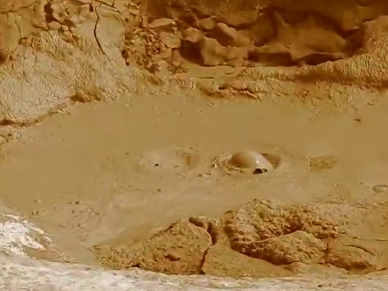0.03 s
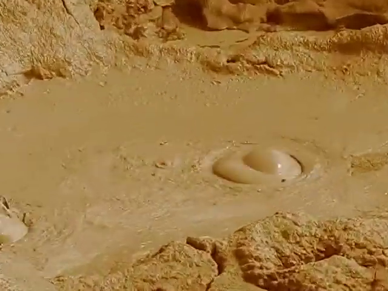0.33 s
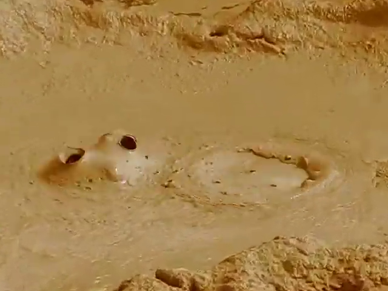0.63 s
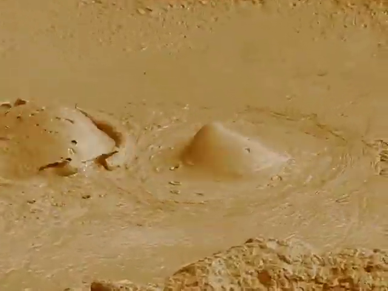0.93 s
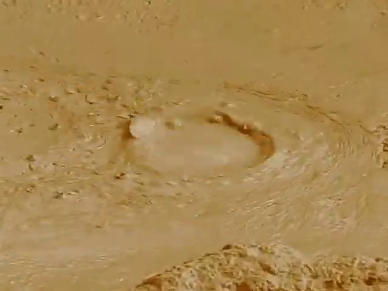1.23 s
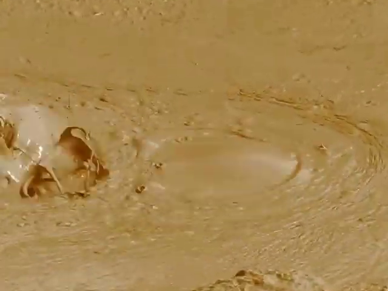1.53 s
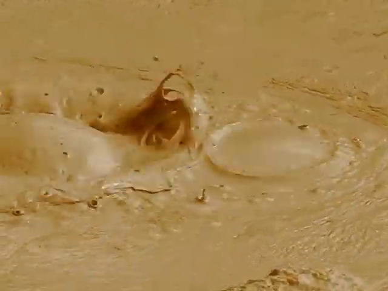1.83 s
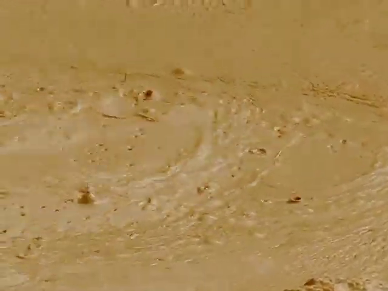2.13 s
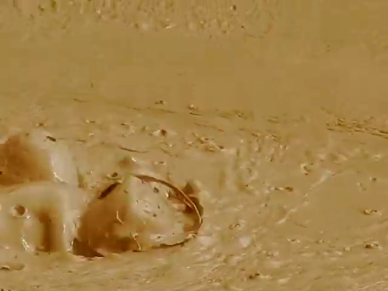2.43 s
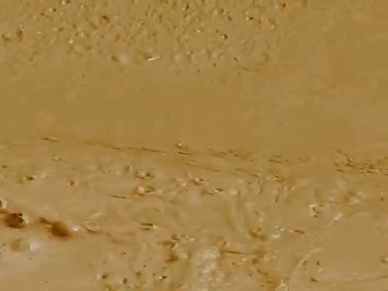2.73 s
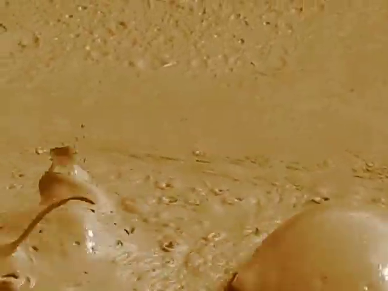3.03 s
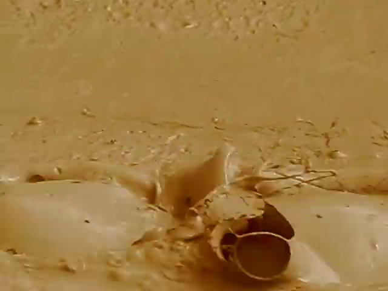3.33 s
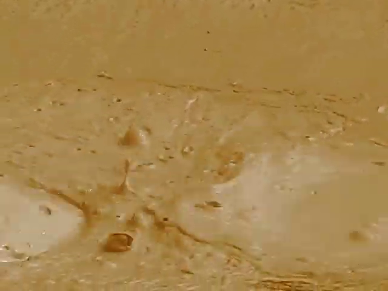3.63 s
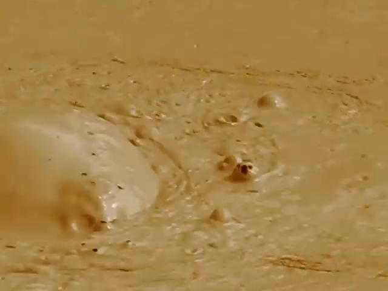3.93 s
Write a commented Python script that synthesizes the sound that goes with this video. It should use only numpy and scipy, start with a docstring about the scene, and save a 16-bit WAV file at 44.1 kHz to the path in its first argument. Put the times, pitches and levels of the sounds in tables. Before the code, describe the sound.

Wind buffets the microphone throughout, rumbling and fluttering over the faint simmer of a boiling mud pool. It crackles hardest from 1 to 1.6 seconds, mostly on the right. A close bubble bursts with a short splat at 2.4 seconds. The wind eases around 3.2 seconds, letting through a few dry ticks, mostly on the right, and very faint steam puffs, then gusts again near 3.8 seconds.

```python
"""Beside a pool of boiling mud, gusty wind buffets the two ports of a microphone.
Big eddies rumble; small ones flutter and slap the ports until they crackle, differently in each ear.
The harder the gust, the brighter it tears. Through it come the distant simmer of the pool,
short dry ticks, most of them in one ear, the sharp splat of one close bubble bursting
and, as the wind eases, faint puffs of steam."""
import sys
import numpy as np
from scipy import signal
from scipy.fft import rfft, irfft
from scipy.io import wavfile

SR = 44100
rng = np.random.default_rng(int(sys.argv[2]) if len(sys.argv) > 2 else 0)


def inscribe(sig):
    """Save sig as 16-bit PCM at rate SR to the path in sys.argv[1].

    A 1-D sig is mono; a 2-D sig holds one channel per row.
    Samples are clipped to [-1, 1] before scaling.
    """
    pcm = np.round(np.clip(np.atleast_2d(sig).T, -1, 1) * 32767)
    wavfile.write(sys.argv[1], SR, pcm.astype(np.int16))


N = 176400
T = np.arange(N) / SR
HZ = np.maximum(np.arange(N // 2 + 1) * SR / N, 1)


def from_db(db):
    """Decibels to gain."""
    return 10 ** (np.asarray(db) / 20)


def in_time(*curves):
    """One row of samples for each curve of (t/s, value)."""
    return np.array([np.interp(T, *np.transpose(c)) for c in curves])


def at_hz(table, hz):
    """Every column of a table, read on a log-frequency axis."""
    f, *columns = np.transpose(table)
    return [np.interp(np.log(hz), np.log(f), c) for c in columns]


def pan(db):
    """Left and right gains for a level difference, left minus right."""
    return from_db(np.array([[db / 2], [-db / 2]]))


def drift(hz):
    """Smooth random wander of spread 1, mostly slower than hz, unrelated at the two ports."""
    step, settle = 20, 2000
    r = np.exp(-2 * np.pi * step * hz / SR)
    white = rng.standard_normal((2, N // step + settle + 2))
    slow = signal.lfilter([1], [1, -2 * r, r * r], white)[:, settle:]
    return np.array([np.interp(np.arange(N) / step, np.arange(len(s)), s / s.std()) for s in slow])


def noise(table):
    """Two unrelated noises with the given levels per half octave."""
    per_hz = from_db(at_hz(table, HZ)[0]) * np.sqrt(SR / (HZ * np.log(2)))
    skirts = np.minimum(1, HZ / table[0][0]) ** 2 * np.minimum(1, table[-1][0] / HZ) ** 2
    return irfft(rfft(rng.standard_normal((2, N))) * per_hz * skirts, N)


def band(hz):
    """Two unrelated noises half an octave wide, rms 1."""
    shape = np.sqrt(np.maximum(0, 1 - 2 * np.abs(np.log2(HZ / hz))))
    x = irfft(rfft(rng.standard_normal((2, N))) * shape, N)
    return x / x.std()


def low_pass(x, hz, order=1):
    """A gentle treble cut."""
    return signal.sosfilt(signal.butter(order, hz, fs=SR, output="sos"), x + 1e-18)


def click(s, db):
    """A single-sample click at s seconds."""
    out = np.zeros(N)
    out[int(s * SR)] = from_db(db)
    return out


def ring(x, hz, t60):
    """A resonance: a unit click sets a sine of height 1 ringing."""
    r, w = from_db(-60 / (t60 * SR)), 2 * np.pi * hz / SR
    return signal.lfilter([0, np.sin(w)], [1, -2 * r * np.cos(w), r * r], x + 1e-18)


# the pool from a distance: f/Hz, level/dB per half octave
SIMMER_SPECTRUM = [(100, -31), (350, -42.5), (1000, -51), (3000, -89.5), (6000, -75), (15000, -91.5)]

def pool_simmer():
    """Distant boiling blurs into a low, steady noise on both sides."""
    return noise(SIMMER_SPECTRUM)


# steam escaping ahead of the microphone: t/s, level/dB, half length/s
STEAM_PUFFS = [(3.45, -66, 0.067), (3.87, -75, 0.061), (3.99, -75, 0.055)]
# its hiss: f/Hz, relative level/dB per half octave
STEAM_SPECTRUM = [(2000, -18), (4000, -4), (6500, -1.5), (8500, -2.5), (11000, 1), (13000, -10),
                  (16000, -8)]

def steam_puffs(width=.3):
    """Escaping steam swells and fades as a soft hiss from straight ahead."""
    mid, side = noise(STEAM_SPECTRUM)
    swell = sum(from_db(db) * np.exp(-.5 * ((T - s) / half) ** 2) for s, db, half in STEAM_PUFFS)
    return swell * (mid + width * side * np.array([[1], [-1]]))


# short dry ticks, most of them in one ear: t/s, level/dB, f/Hz, left minus right/dB
DRY_TICKS = [(0.121, -30, 3000, 16), (3.2552, -38, 4300, 2), (3.2955, -34, 2000, -13),
             (3.4833, -29.5, 2700, -19), (3.515, -27.5, 2180, -19)]

def dry_ticks(cycles=14):
    """Each tick is a ring that dies in a few cycles."""
    ticks = sum(pan(pan_db) * ring(click(s, db), hz, cycles / hz) for s, db, hz, pan_db in DRY_TICKS)
    return low_pass(ticks, hz=5000)


# cavity of a bubble close to the microphone: f/Hz, gain/dB, t60/s
CAVITY_MODES = [(1610, -5, 0.0047), (2160, -3, 0.0049), (3270, -10, 0.0054), (5170, -8.5, 0.0019),
                (8200, -22, .004)]

def bubble_splat(s=2.4072, tear_db=-27, decay_s=.0018, snap_db=4.5, left_lag_s=.0012):
    """A film of mud tears in a few milliseconds and rings the cavity, close by and slightly right."""
    envelope = (T >= s) * np.exp(-np.abs(T - s) / decay_s)
    tear = from_db(tear_db) * rng.standard_normal(N) * envelope
    cavity = sum(ring(tear, hz, t60) * from_db(db) for hz, db, t60 in CAVITY_MODES)
    splat = from_db(snap_db) * tear + cavity
    at_ports = np.array([np.interp(T - left_lag_s, T, splat), splat])
    return pan(db=-3) * low_pass(at_ports, hz=7500, order=2)


# big eddies on the microphone: f/Hz, level/dB per half octave
RUMBLE_SPECTRUM = [(16, -46.5), (33, -34), (65, -28.5), (125, -25.5), (190, -24.5), (270, -28.5),
                   (400, -30), (800, -54.5)]
# their rise and fall at each port: t/s, gain/dB
RUMBLE_GAIN_LEFT = [(0.0, 4.5), (0.12, -7.5), (0.64, 1.5), (0.84, -7.5), (0.96, 5), (1.32, -5.5), (1.4, -3),
                    (1.88, -0.5), (2.12, -1), (2.56, 0.5), (2.84, -6), (3.5, 1), (3.84, 1.5), (3.99, -1.5)]
RUMBLE_GAIN_RIGHT = [(0.0, 3), (0.6, 1), (0.72, -0.5), (0.92, 0.5), (1.6, 2), (1.72, -2), (1.84, 3.5),
                     (2.16, -5.5), (2.28, 3), (2.6, -8.5), (2.895, -0.5), (3.12, -6), (3.68, -3),
                     (3.76, -10), (3.99, -7.5)]

def wind_rumble(buffet_db, spread_db=2, buffet_share=.6):
    """Big eddies press on each port in slow lumps; the deepest rumble leans to the right."""
    air = noise(RUMBLE_SPECTRUM)
    air = air + (pan(db=-7.5) - 1) * low_pass(air, hz=60)
    lumps_db = spread_db * drift(hz=10.6) + buffet_share * buffet_db
    return air * from_db(in_time(RUMBLE_GAIN_LEFT, RUMBLE_GAIN_RIGHT) + lumps_db)


# small eddies at the ports: f/Hz, level/dB per half octave, rise/dB per dB of gust, flutter depth/dB
SMALL_EDDIES = [(149, -37.5, 1.5, 6), (273, -30, 1.3, 2), (510, -30.5, 0.95, 1.13), (797, -36.5, 1.36, 2.5),
                (1165, -40.5, 0.79, 3.5), (1440, -41.5, 0.53, 3.5), (2330, -43.5, 0.6, 4),
                (3060, -49, 1.14, 4.5), (4300, -60, 1.57, 5.5), (6130, -73, 1.55, 6.5), (8800, -86, 1.9, 7),
                (14000, -103, 1.2, 1.5)]
# brightness of their flutter: t/s, left tilt/dB per octave, right tilt/dB per octave
FLUTTER_TILT = [(0, 0.9, -1.5), (.5, 1.5, -0.5), (.8, 0.54, -0.3), (1.5, 0.5, 0.5), (2.1, 0, 0),
                (2.8, -0.74, -1.5), (3.15, -3, -5.5), (3.7, -0.6, 0.5), (4, -0.9, -3.5)]

def wind_flutter(gust_db, flutter_hz=193, sway_hz=25, pivot_hz=920, limit=5):
    """Small eddies arrive in bursts of a few milliseconds; the treble is fitful and needs a hard gust."""
    shared_bursts = drift(flutter_hz) + .47 * drift(sway_hz)
    tilt = in_time([(s, left) for s, left, _ in FLUTTER_TILT],
                   [(s, right) for s, _, right in FLUTTER_TILT])
    centres_hz = 16 * 2 ** (np.arange(21) / 2)
    out = 0
    for hz in centres_hz[centres_hz > SMALL_EDDIES[0][0]]:
        level_db, follows, depth_db = at_hz(SMALL_EDDIES, hz)
        bursts = shared_bursts + .45 * drift(flutter_hz)  # each band also flickers on its own
        flutter = from_db(depth_db * limit * np.tanh(bursts / limit))
        gain = from_db(level_db + follows * gust_db + tilt * np.log2(hz / pivot_hz))
        out = out + band(hz) * gain * flutter / np.sqrt(np.mean(flutter ** 2))
    return out


def eddy_slaps(rows, pressure=.45, half_s=.00099):
    """Single eddies slap one port: their pulses of suction, and the envelope of their cracks."""
    suction, crack = 0, 0
    for s, db in rows:
        u = .5 * ((T - s) / half_s) ** 2
        suction = suction - pressure * (1 - u) * np.exp(-u / 2)
        crack = crack + from_db(db) * np.exp(-u)
    return suction, crack


# eddies that hit a port hard enough to crack: t/s, crack gain/dB
LEFT_PORT_SLAPS = [(.0665, 4), (.294, -4), (.31, -5), (.458, -5), (1.07, 3), (1.121, -2), (2.056, 2.5),
                   (2.534, -5), (2.582, -1)]
RIGHT_PORT_SLAPS = [(.075, -3), (.201, -12), (.413, -5), (.554, -1), (.979, 3), (1.083, 1), (1.21, 4),
                    (1.256, 4), (1.302, 5), (1.333, -1), (1.346, 5), (1.405, 5), (1.412, 5), (1.445, -5),
                    (1.524, 5.5), (1.56, 3), (1.587, 5), (1.877, -2)]
# an overloaded port: f/Hz, level/dB per half octave
CRACKLE_SPECTRUM = [(2000, -35), (4200, -38.5), (6300, -47.5), (15000, -62.5)]

def with_port_crackle(wind, onset=.33, full=.62):
    """The ports crack for a millisecond or two at every slap and at every high crest of pressure."""
    suction, crack = np.stack([eddy_slaps(LEFT_PORT_SLAPS), eddy_slaps(RIGHT_PORT_SLAPS)], axis=1)
    overload = np.clip((np.abs(wind) - onset) / (full - onset), 0, 1)
    return wind + suction + noise(CRACKLE_SPECTRUM) * np.maximum(crack, overload)


# gusts right on the microphone, port by port: t/s, strength/dB
LEFT_PORT_GUSTS = [(0.0, 3.5), (0.04, 5), (0.24, 3.5), (0.46, 9.5), (0.84, -3.5), (1.04, 4), (1.6, 3),
                   (2.01, 4.5), (2.12, 2.5), (2.32, 3), (2.38, -3), (2.46, 3.0), (3.2, -4.5), (3.24, -14),
                   (3.36, -4.5), (3.52, -6), (3.6, 3.5), (3.76, -1), (3.84, 8.5), (3.99, -4.5)]
RIGHT_PORT_GUSTS = [(0.0, 0), (0.32, -2.5), (0.519, 4), (0.84, -5.5), (0.92, 2), (1.16, 0), (1.385, 9),
                    (1.601, 4.5), (1.68, -7.5), (1.8, 1.5), (2.2, -4.5), (2.44, 0), (2.56, -0.5), (2.6, -4),
                    (2.88, -7), (2.961, -10), (3.04, -7), (3.28, -12), (3.64, 1.5), (3.76, -23),
                    (3.96, -9.5), (3.99, -22)]
# single buffets on top of them: t/s, left change/dB, right change/dB
PORT_BUFFETS = [(0.069, 6.5, 5.5), (0.202, 7.5, 6.5), (0.296, 4.5, 5.5), (0.722, 5, 4.5), (0.819, 5.5, 4.5),
                (.98, 2, 3), (1.12, 5, 1.5), (1.21, 3.5, 8.5), (1.259, 6.5, 5.5), (1.552, 0.5, 5),
                (1.868, 2.5, 3.5), (2.768, 3, 6), (2.897, 8, 5), (3.52, -16, 5.5), (3.618, -5.5, 2.5),
                (3.758, -4, 21), (3.84, -2.5, 17), (3.908, -3.5, 11.5)]

def wind_on_microphone(buffet_half_s=.016):
    """Gusts, and buffets a few hundredths of a second long, make the ports rumble, flutter and crack."""
    buffet_db = sum(np.outer([left, right], np.exp(-.5 * ((T - s) / buffet_half_s) ** 2))
                    for s, left, right in PORT_BUFFETS)
    gust_db = in_time(LEFT_PORT_GUSTS, RIGHT_PORT_GUSTS) + buffet_db
    return with_port_crackle(wind_rumble(buffet_db) + wind_flutter(gust_db))


def scene():
    """Wind on the microphone over dry ticks and the sounds of the pool."""
    return wind_on_microphone() + dry_ticks() + bubble_splat() + steam_puffs() + pool_simmer()


def record(dry):
    """The highest peaks are rounded and the top of the treble is cut steeply."""
    ceiling, cutoff_hz = .67, 15800
    rounded = dry / (1 + (dry / ceiling) ** 4) ** (1 / 4)
    return signal.sosfilt(signal.ellip(10, .1, 80, cutoff_hz, fs=SR, output="sos"), rounded)


dry = scene()
out = record(dry)
inscribe(out)
```